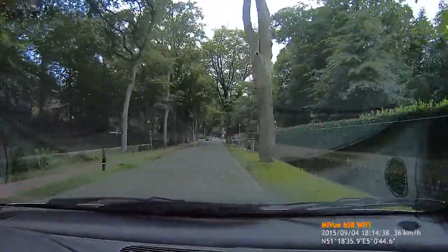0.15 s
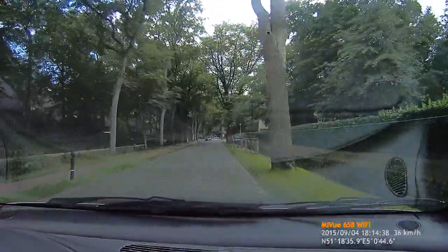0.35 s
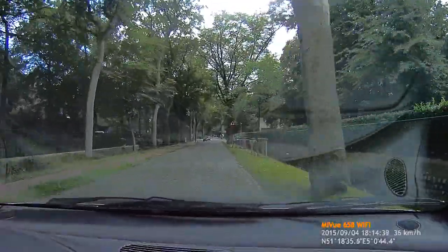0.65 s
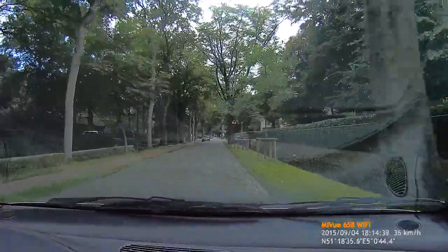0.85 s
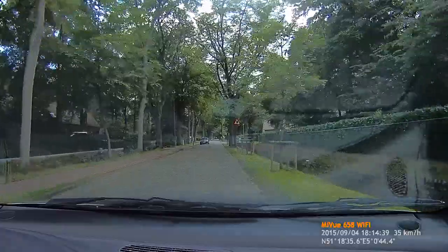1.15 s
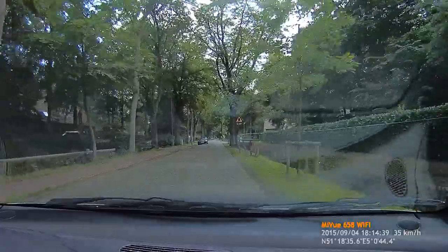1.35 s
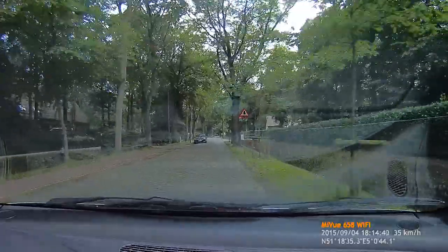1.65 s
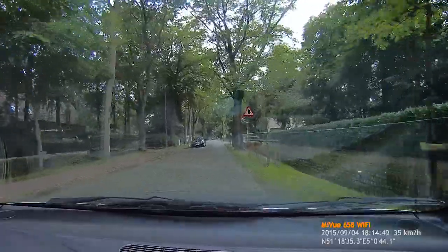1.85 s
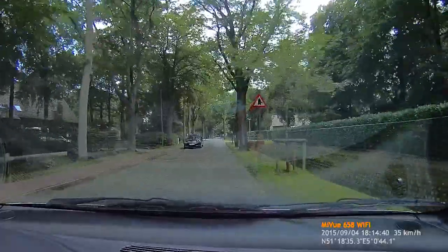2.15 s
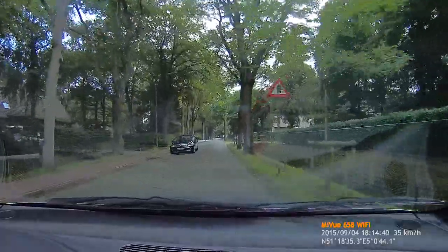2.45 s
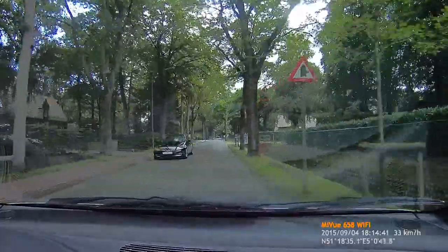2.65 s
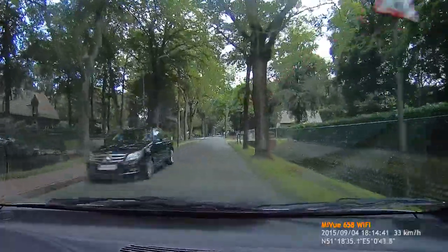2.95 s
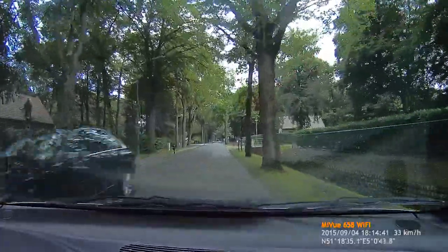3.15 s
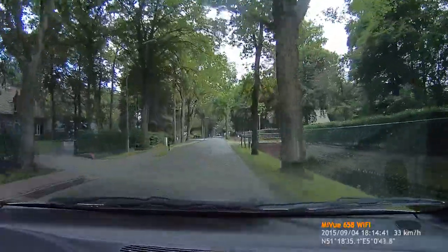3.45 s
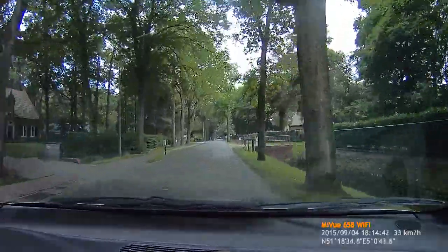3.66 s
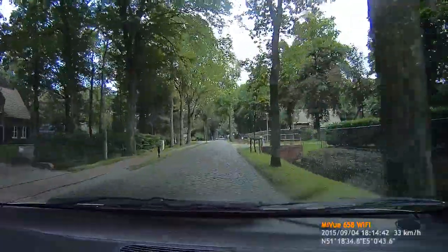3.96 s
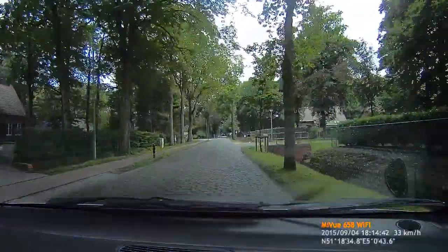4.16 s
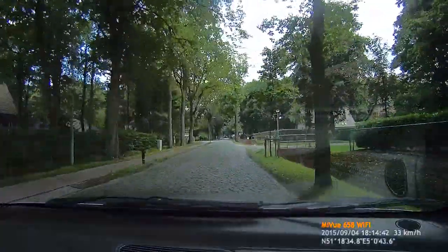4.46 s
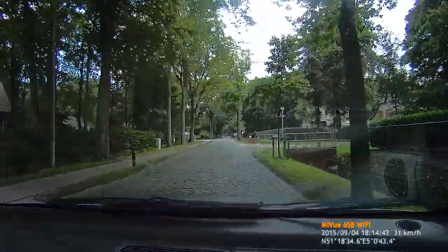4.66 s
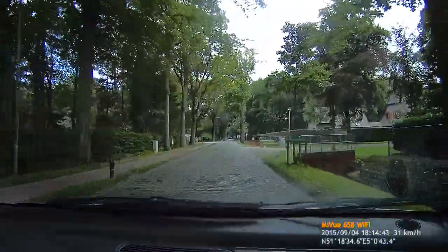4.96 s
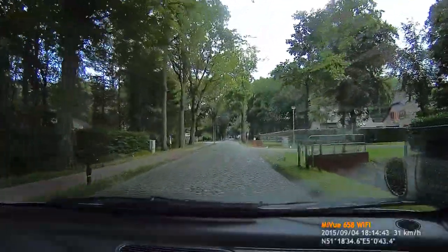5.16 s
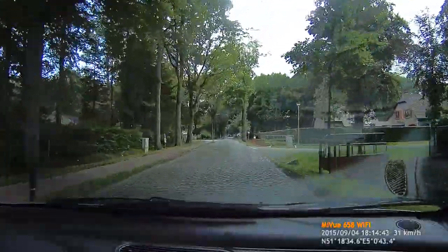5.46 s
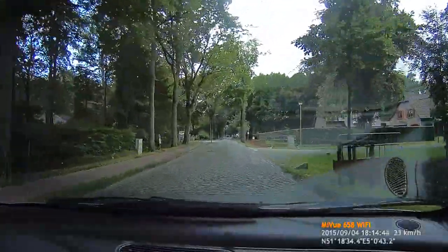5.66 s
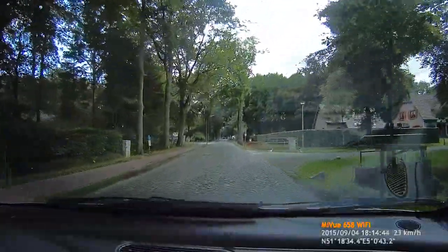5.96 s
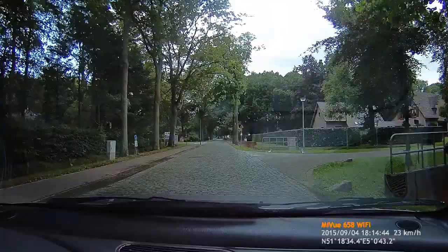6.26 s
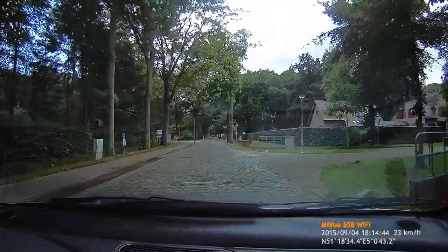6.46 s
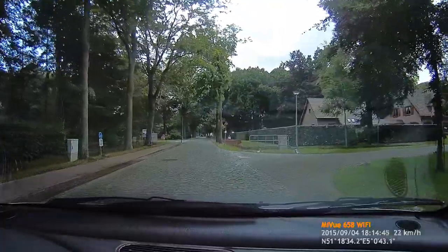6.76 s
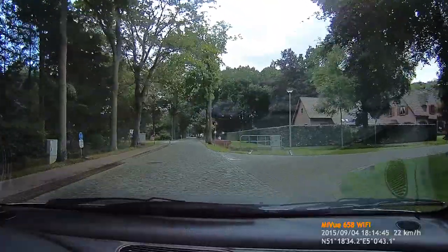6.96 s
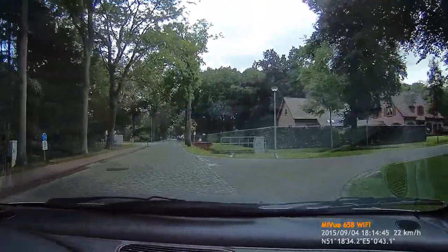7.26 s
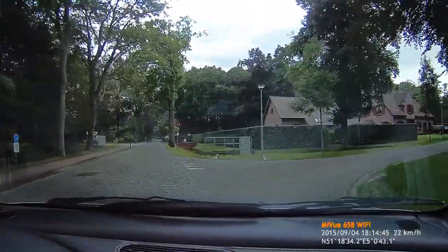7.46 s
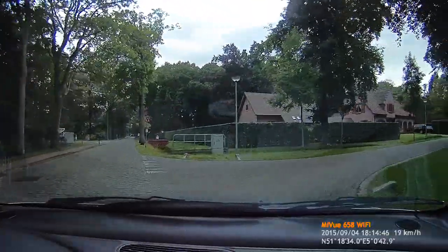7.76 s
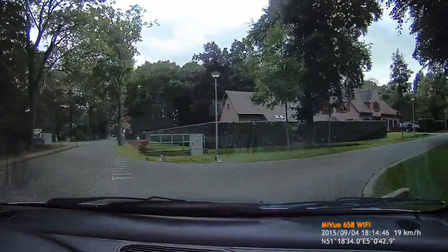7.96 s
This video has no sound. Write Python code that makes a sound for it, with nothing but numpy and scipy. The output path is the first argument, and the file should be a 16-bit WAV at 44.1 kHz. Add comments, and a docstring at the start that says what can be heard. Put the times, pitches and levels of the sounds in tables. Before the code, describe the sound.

Inside a slowing car on cobblestones, tyres drum over a deep boom while loose trim rattles and a turn indicator starts clicking.

```python
"""Inside a car slowing on cobbles, heard at the windscreen. From the start the stones shake the body
into a deep boom and the tyres drum and roar; loose trim buzzes, rattles, ticks and snaps, and bumps
knock the dashboard. At 3.4 s the turn indicator relay starts clicking, closing and opening in turn.
From about 5 s road and trim grow quieter; the relay clicks on to the end, over faint hiss."""
import sys
import numpy as np
from scipy import signal
from scipy.fft import rfft, irfft, next_fast_len
from scipy.io import wavfile
from scipy.ndimage import uniform_filter1d, map_coordinates

SR = 44100
rng = np.random.default_rng(int(sys.argv[2]) if len(sys.argv) > 2 else 0)


def dump(signal):
    """Clip the signal to [-1, 1] and save it as 16-bit WAV at the path in sys.argv[1]."""
    limited = np.clip(np.atleast_2d(signal).T, -1, 1)
    pcm = np.round(limited * 32767).astype(np.int16)
    wavfile.write(sys.argv[1], SR, pcm)


N = 357648

# Microphone hiss. Each row: frequency in Hz, density in dB.
HISS_SPECTRUM = [(880, -33.5), (1500, -13.5), (2040, -9), (3120, -7.5), (3540, -6.5), (6300, -10),
                 (8180, -8.5), (8410, -10), (12300, -10), (13400, -26.5), (15000, -33)]
# Electronics whine. One row: frequency in Hz, level in dB.
WHINE_TONE = [(7881, -88.5)]
# Loose trim. Each row: time in seconds, chatter in dB, fizz in dB.
TRIM_LEVELS = [(0.0, -63.5, -72.5), (0.67, -59.5, -82), (0.97, -62, -76), (1.49, -64.5, -81.5),
               (2.21, -59.5, -74), (2.39, -62.5, -80.5), (2.89, -61.5, -75.5), (3.45, -66, -77.5),
               (3.61, -66, -79.5), (4.09, -63.5, -78), (4.61, -62.5, -75.5), (4.79, -64.5, -78.5),
               (5.17, -69, -82), (5.6, -72.5, -83.5), (5.75, -73.5, -86), (5.94, -66, -78),
               (6.19, -72, -82), (7.16, -73.5, -86), (7.93, -75, -83.5), (8.11, -77, -88)]
# Resonances. Each row: frequency in Hz, width in Hz, gain in dB.
PANEL_MODES = [(1298, 205, 7), (2040, 380, -1.5), (2350, 240, -4.5), (3170, 710, -8.5), (4830, 2600, -14.5)]
METAL_MODES = [(5240, 1700, 0.5), (7560, 1800, 3), (9650, 1300, 3.5), (11950, 1500, 2), (14500, 860, -7.5)]
TICK_MODES = [(3290, 620, -5.5), (4860, 1260, 4), (5253, 830, 4.5), (6800, 940, -17), (2140, 1440, 1)]
DASH_MODES = [(780, 780, 7), (1180, 560, 9), (1530, 140, 0), (2000, 380, -1.5), (3630, 1400, -15.5)]
HOLLOW_MODES = [(1220, 150, 1), (1540, 99, 4.5), (1895, 100, 2.5), (3680, 360, -10.5), (4750, 200, -9.5),
                (5500, 330, -18.5)]  # plastic around the slipping part
TYRE_MODES = [(89.4, 16.8, 2.5), (135.4, 18.3, 0.5), (179.3, 31.4, -10), (240.7, 37.2, -9),
              (296.3, 92, -17.5)]
BOOM_MODES = [(36.1, 6.44, 4.5), (57.9, 13.9, -3), (26.6, 12.5, -6.5), (68, 31, -10.5)]
# Loose bits. Each row: pitch in Hz, gain in dB, t60 in seconds.
LOOSE_BITS = [(1360, 4.5, 0.019), (1820, 3.5, 0.017), (2140, 5.5, .012), (2460, -1.5, 0.0098),
              (3550, -0.5, 0.0093), (4520, -9, 0.0084), (5600, -7.5, 0.0077), (7500, -16.5, .004),
              (11500, -12.5, .003)]
# Small parts in motion. Each row: start in seconds, relative level in dB.
TICK_HITS = [(0.06, -50), (0.193, -54.5), (0.252, -61), (0.2809, -66), (0.39, -63), (0.4131, -60),
             (0.456, -52.5), (0.506, -64), (0.597, -71), (0.895, -66), (0.973, -64), (1.0244, -58),
             (1.0375, -59), (1.146, -57), (1.3212, -59), (1.3498, -57), (1.3631, -58), (1.3897, -56),
             (1.449, -62.5), (1.4615, -62), (1.6265, -52), (1.6914, -59), (1.706, -67), (1.7209, -59),
             (1.731, -60), (1.7405, -57), (1.8486, -54.5), (1.858, -55.5), (1.8964, -52.5), (2.333, -55),
             (2.347, -64), (2.405, -61), (2.4226, -59), (2.665, -65), (2.976, -67), (3.242, -63),
             (2.4874, -59), (2.5098, -60), (2.6895, -57), (2.717, -56.5), (2.7482, -61), (2.787, -59),
             (2.839, -58), (2.987, -56.5), (3.0705, -58), (3.125, -55.9), (3.198, -53.5), (3.3622, -58),
             (3.3863, -49), (3.4455, -69), (3.4686, -61), (3.6526, -64), (3.6797, -70), (3.5997, -62),
             (3.968, -65), (4.0439, -60), (4.1145, -54.5), (4.1241, -58), (4.3357, -56), (4.4717, -60),
             (4.49, -63), (4.681, -59), (4.743, -61), (4.759, -57), (4.858, -70), (4.8995, -64),
             (4.928, -66), (4.9538, -54), (5.082, -66), (5.1278, -60), (5.355, -68), (5.42, -69),
             (5.4415, -51), (5.4703, -65), (5.5448, -63), (5.673, -60), (6.0901, -65), (6.6347, -57),
             (6.9422, -58), (7.016, -64), (7.171, -64.5), (7.446, -54), (7.844, -61), (7.935, -54.5),
             (8.022, -59)]
PING_HITS = [(0.561, -64), (0.6454, -59), (0.874, -63), (1.2805, -58), (2.1588, -56), (2.7262, -59),
             (3.0518, -63), (3.0668, -56), (3.3622, -59), (4.3908, -58)]
TAP_HITS = [(0.4783, -45), (0.5237, -50), (1.093, -49), (1.5773, -50), (1.6717, -54), (1.9699, -51),
            (3.0842, -45), (3.1178, -48), (3.766, -54), (3.8, -49), (3.816, -48), (4.147, -53),
            (4.1589, -48), (4.3384, -51), (5.4014, -56), (5.6289, -58), (6.0776, -51), (6.638, -52),
            (6.707, -54), (7.2779, -52.5), (7.889, -56)]
SLIP_HITS = [(0.6538, -61), (0.6777, -56), (0.7036, -59.5), (0.7286, -57.5), (0.752, -60), (0.7755, -60.5),
             (0.798, -62.5), (0.8179, -63), (2.1207, -65.5), (2.142, -65), (2.168, -60), (2.192, -63),
             (2.2174, -61), (2.2394, -61), (2.2628, -60), (2.287, -63.5)]  # one slip per swing of the body
# Tapping part bouncing. Each row: start in seconds, length in seconds, relative level in dB.
BOUNCE_RUNS = [(3.431, .07, -52), (3.512, .05, -49.5), (3.661, .06, -50), (5.7174, .05, -50.5),
               (5.835, .06, -55)]
# Its upper modes. Each row: frequency in Hz, gain in dB.
TAP_UPPER_MODES = [(2520, -8.5), (3550, -11)]
# Dashboard knocks. Each row: start in seconds, relative level in dB, pitch in Hz.
DASH_HITS = [(0.465, -37.5, 950), (0.473, -35, 947), (0.605, -44, 675), (0.676, -42, 930),
             (0.797, -40.5, 895), (1.078, -44, 750), (1.419, -47, 603), (1.875, -38, 604),
             (2.046, -40, 738), (2.075, -39, 650), (2.121, -35, 670), (2.145, -42, 1000),
             (2.169, -33.5, 666), (2.23, -34.5, 714), (2.371, -35, 686), (2.804, -41, 1150),
             (3.161, -33, 598), (3.238, -42, 600), (3.352, -46, 950), (3.765, -35, 665),
             (3.978, -58.5, 2260), (4.128, -50, 1200), (4.473, -41, 900), (5.138, -41.5, 603),
             (5.352, -39, 596), (5.402, -40, 565), (5.629, -41, 580), (5.717, -43, 694), (6.107, -41, 665),
             (6.177, -44, 1070), (6.181, -45, 1570), (6.267, -57, 1070), (6.7874, -58, 1500),
             (6.8567, -55.5, 2250), (7.2459, -54, 1380), (7.277, -41, 910), (7.307, -49, 1150),
             (7.42, -50, 990), (7.632, -60, 1310)]
# A part slides and catches. Each row: start in seconds, relative level in dB, crack, knock and
# ring gains in dB, slide and t60 in seconds.
SNAP_HITS = [(0.2572, -43.5, 0, -2, 4, 0.00033, 0.0059), (1.28, -63, -12.5, 1.5, 9, 0.0024, 0.03),
             (2.753, -55.5, -17, -6, -4, 0.0037, 0.04), (2.801, -43, -22, -3.5, -3.5, 0.018, 0.067),
             (4.627, -54, -19, 3, -1.5, 0.0023, 0.045), (5.1832, -47.5, -14, -13, -12, 0.0089, 0.021),
             (5.2492, -70, -10, 7.5, 10, 0.0092, .08), (5.3305, -66.5, -15, 4, 12, 0.0063, 0.035),
             (5.5318, -74, -10, 7, 12, .01, .06), (5.828, -69.5, -11, 9, 1, 0.004, 0.26),
             (5.9288, -66, -20, 6.5, 1, 0.0026, 0.03), (6.1772, -47, -38, -8, 2, 0.0098, 0.054)]
# Relay case ring. Each row: frequency in Hz, gain in dB, t60 in seconds.
CLOSING_MODES = [(2053, 7.5, 0.027), (2240, -10, 0.026), (1570, -3, 0.027), (3630, -4, 0.034)]
OPENING_MODES = [(1792, 2.5, 0.033), (2060, -4, 0.03), (2360, -3, 0.028), (3680, -10.5, 0.032)]
# Road noise as the car slows. Each row: time in seconds, boom, drum and roar in dB.
ROAD_LEVELS = [(0, -22, -25, -37.5), (.2, -24.5, -30, -49), (.7, -21, -30, -45), (1.2, -25.5, -30.5, -49),
               (1.6, -23, -32.5, -49), (2.02, -25, -30.5, -48.5), (2.4, -22.5, -32.5, -47.5),
               (3.1, -23, -29.5, -47), (3.6, -24.5, -31, -49), (4.3, -20, -31, -51),
               (4.7, -25.5, -33, -49.5), (5.15, -25, -35, -52.5), (5.8, -27.5, -35, -53.5),
               (6.15, -29.5, -37, -54.5), (6.9, -30, -37, -58.5), (7.3, -27, -37.5, -56.5),
               (8.11, -29.5, -39.5, -55)]
# Tread roar. Each row: frequency in Hz, density in dB.
TREAD_SPECTRUM = [(180, -32), (300, 0), (408, -3.5), (446, -11.5), (498, -7.5), (747, -10), (818, -13),
                  (1070, -20), (1650, -32), (1840, -29.5), (2600, -41.5), (3380, -51.5), (5720, -120)]
# Raised stones. Each row: time in seconds, drum swell in dB, roar swell in dB.
RAISED_STONES = [(.07, 2, -3), (0.296, 4.5, 9), (.58, 4.5, -1.5), (1.45, 2, -1.5), (1.65, 6, 1.5),
                 (1.89, -0.5, 6), (2.13, 1, 4.5), (2.38, 4, 4.5), (2.648, 4, 4.5), (2.7, 4, 1),
                 (3.16, -0.5, 2), (3.43, 0, 3), (4.399, -5, 7), (4.501, -2.5, -7), (5.36, 2, 4),
                 (5.47, 0.5, 4), (5.55, 0.5, 4.5), (5.721, -1, 7.5), (5.79, 1.5, 3), (6.202, 3, -6.5),
                 (6.662, -3, 12.5), (7.01, 3, 9), (7.07, 5, 4), (7.37, 5, 2), (7.43, 2.5, -4.5),
                 (7.82, 0.5, -2.5)]
# The low boom swells and dips irregularly. Each row: time in seconds, change in dB, length in seconds.
BOOM_SWELLS = [(0.082, 6.5, 0.054), (0.188, -10.5, .04), (0.288, 6.5, 0.078), (0.505, 7.5, 0.017),
               (0.63, -4.5, 0.051), (1, 5.5, 0.036), (1.137, 2.5, 0.054), (1.195, -7, 0.023),
               (1.297, -8, 0.035), (1.378, 5, 0.17), (1.85, 5, 0.11), (1.99, -9, 0.04), (2.203, -5, 0.018),
               (2.247, 6.5, 0.056), (2.413, 0.5, 0.044), (2.608, 6, 0.04), (2.83, 1, 0.096),
               (3.393, 11.5, 0.024), (3.525, 7.5, 0.027), (3.6, -4.5, 0.043), (3.7, 4.5, 0.051),
               (3.743, -8.5, 0.017), (3.829, 5.5, 0.05), (4.003, 1, 0.13), (4.168, 6, 0.011),
               (4.096, -6, .03), (4.232, -7, 0.038), (4.578, 3, 0.072), (4.682, -7, .04),
               (4.76, 4.5, 0.032), (4.806, -9, .02), (4.886, -6.5, 0.024), (4.938, 6, 0.033),
               (5.29, -6, 0.018), (5.394, 7, 0.06), (5.42, -10.5, 0.028), (5.467, 8.5, 0.023),
               (5.525, -1, .025), (5.882, 3, 0.073), (6.204, -12, .025), (6.26, 5.5, 0.072),
               (6.63, 1.5, 0.071), (6.91, 4.5, 0.013), (7.456, 5.5, 0.074), (7.6, -7, 0.024),
               (7.653, 8, 0.013)]

STONE_S = 0.041  # wheel over one stone
RELAY_START_S, RELAY_STEP_S = 3.4057, 0.32591
BOUNCE_STEP_S, BOUNCE_FADE_DB_PER_S = 0.0168, 26
NOTCH_HZ, NOTCH_WIDTH_HZ, NOTCH_DB = 2940, 580, -16.5
TOP_HZ = 15000


def amp(db):
    """dB to gain."""
    return 10 ** (np.asarray(db) / 20)


def unit(x):
    """x at rms 1."""
    return x / np.sqrt(np.mean(x ** 2) + 1e-20)


def curves(rows):
    """A per-sample curve for each column after the time."""
    times_s, *columns = np.transpose(rows)
    return [np.interp(np.arange(N) / SR, times_s, column) for column in columns]


def wobble(rate_hz):
    """Smooth random curve."""
    knots = rng.standard_normal(int(N * 200 / SR) + 4)
    return map_coordinates(knots, [np.arange(N) * rate_hz / SR])


def swells(times_s, heights_db, lengths_s):
    """Sum of bell curves, in dB."""
    t, sum_db = np.arange(0, N, 64) / SR, 0
    for at_s, db, length_s in np.broadcast(times_s, heights_db, lengths_s):
        sum_db += db * np.exp(-2 * ((t - at_s) / length_s) ** 2)
    return np.interp(np.arange(N) / SR, t, sum_db)


def filtered(x, *responses):
    """x through frequency responses in series."""
    size = next_fast_len(N + SR // 2)
    for response in responses:
        x = irfft(rfft(x, size) * response(np.fft.rfftfreq(size, 1 / SR)), size)[:N]
    return x


def modes(table):
    """Response of resonances of alternating sign."""
    return lambda f: sum((-1) ** k * amp(db) * 1j * f * width / (hz * hz - f * f + 1j * f * width)
                         for k, (hz, width, db) in enumerate(table))


def colour(points):
    """Response through (Hz, dB) points, log axis."""
    hz, db = np.transpose(points)
    return lambda f: amp(np.interp(np.log(f + 1), np.log(hz + 1), db))


def band(lo_hz, hi_hz):
    """Band-pass: third order below, second above."""
    return lambda f: (1j * f / lo_hz / (1 + 1j * f / lo_hz)) ** 3 / (1 + 1j * f / hi_hz) ** 2


def impulses(per_s, spread_db):
    """Random impulses of either sign, a few much larger."""
    chance, sign, size = rng.random((3, N))
    return (chance < per_s / SR) * np.sign(sign - 0.5) * amp(-spread_db * np.log(size + 1e-4))


def faint_hits(per_s):
    """Random (s, dB) hits that follow the chatter level."""
    gap, scatter = rng.random((400, 2)).T
    times_s = np.cumsum(-np.log(gap + 1e-9)) / per_s
    chatter_db = curves(TRIM_LEVELS)[0][np.minimum(times_s * SR, N - 1).astype(int)]
    hits = np.c_[times_s, chatter_db - 4 + 8 * (scatter - 0.5)]
    return hits[times_s < (N - 1) / SR].tolist()


def rings(hits, pitch_hz, rise_s, t60_s, rough, gain_db):
    """A short, rough, slightly detuned ring per hit."""
    out, t = np.zeros(N + SR), np.arange(SR // 16) / SR
    for (start_s, db), hz in zip(hits, np.resize(pitch_hz, len(hits))):
        noise = rng.standard_normal(len(t))
        drift = np.cumsum(uniform_filter1d(rough * noise, size=30))
        phase = 2 * np.pi * hz * (1 + 0.028 * noise[0]) * t + drift
        envelope = amp(db + gain_db - 60 * t / t60_s) * (1 - np.exp(-t / rise_s))
        out[round(start_s * SR):][:len(t)] += envelope * np.sin(phase)
    return out[:N]


def cabin_echo(x, t60_s=0.09):
    """Glass and seats add a short, dull tail, drawn anew every 1/8 s."""
    size = SR // 8
    t = np.arange(size) / SR
    blocks = np.pad(x, (0, -N % size)).reshape(-1, size)
    tails = amp(-60 * t / t60_s) * (t > 0.0015) * rng.standard_normal(blocks.shape)
    tails /= np.linalg.norm(tails, axis=1, keepdims=True)
    wet = signal.fftconvolve(blocks, tails, axes=1)
    overlap = np.pad(wet[:-1, size:], ((0, 0), (0, 1))).ravel()
    echo = wet[:, :size].ravel() + np.pad(overlap, (size, 0))
    return x + amp(-6.5) * filtered(echo[:N], band(180, 9000))


def electronics():
    """Microphone hiss and a thin whine."""
    hiss = amp(-78.5 + 2.3 * wobble(15)) * unit(filtered(rng.standard_normal(N), colour(HISS_SPECTRUM)))
    (hz, db), = WHINE_TONE
    whine = np.sqrt(2) * amp(db + 1.2 * wobble(7.6)) * np.sin(2 * np.pi * hz * np.arange(N) / SR)
    return hiss + whine


def trim_buzz():
    """Shaken panels chatter in clumps of tiny contacts; smaller parts fizz above."""
    chatter_db, fizz_db = curves(TRIM_LEVELS)
    times_s, _, roar_swell_db = np.transpose(RAISED_STONES)
    shake_db = 0.62 * swells(times_s, roar_swell_db, STONE_S) + wobble(4.9)
    panel_hits = amp(shake_db + 2.8 * wobble(55)) * impulses(per_s=1600, spread_db=1.9)
    metal_hits = amp(shake_db + 5.1 * wobble(60)) * impulses(per_s=1600, spread_db=2.1)
    chatter = filtered(panel_hits, modes(PANEL_MODES), band(630, 6000))
    fizz = filtered(metal_hits, modes(METAL_MODES), band(2100, 14000))
    return amp(chatter_db - 3.5) * unit(chatter) + amp(fizz_db) * unit(fizz)


def loose_bits(per_s=600, spread_db=2.6, detune=0.089):
    """Bits of trim jiggle throughout: short rings at scattered pitches."""
    gap, pick, size, tune = rng.random((5400, 4)).T
    starts = (SR * np.cumsum(-np.log(gap + 1e-9)) / per_s).astype(int)
    hz, gain_db, t60_s = np.array(LOOSE_BITS)[(pick * len(LOOSE_BITS)).astype(int)].T[..., None]
    clump_db = curves(TRIM_LEVELS)[0] + 2.8 * wobble(18)
    hit_db = clump_db[np.minimum(starts, N - 1)] - spread_db * np.log(size + 1e-3)
    offsets = np.arange(SR // 80)
    t = offsets / SR
    pitch_hz = hz * (1 + detune * (2 * tune[:, None] - 1))
    envelope = amp(hit_db[:, None] + gain_db - 5 - 60 * t / t60_s) * (1 - np.exp(-t / 0.0007))
    ring = envelope * np.sin(2 * np.pi * pitch_hz * t)
    return np.bincount((starts[:, None] + offsets).ravel(), ring.ravel(), N)[:N]


def plastic_ticks():
    """Hard plastic rings for a few cycles; its mount absorbs one band."""
    blows = np.zeros(N)
    for start_s, db in TICK_HITS + faint_hits(per_s=20):
        blows[round(start_s * SR)] = amp(db + 26.5)
    mount = lambda f: 1 - (1 - amp(NOTCH_DB)) * modes([(NOTCH_HZ, NOTCH_WIDTH_HZ, 0)])(f)
    return filtered(blows, modes(TICK_MODES), modes(TICK_MODES), mount)


def pings():
    """Bumps ping a small hard part."""
    return rings(PING_HITS, pitch_hz=5570, rise_s=0.00067, t60_s=0.015, rough=0.32, gain_db=5.5)


def tapping_part():
    """A loose part taps and bounces in its seat, ringing in three modes."""
    bounces = [(start_s + s, db - BOUNCE_FADE_DB_PER_S * s + rng.normal(0, 0.77))
               for start_s, length_s, db in BOUNCE_RUNS for s in np.arange(0, length_s, BOUNCE_STEP_S)]
    hits = TAP_HITS + bounces + faint_hits(per_s=5.8)
    upper = sum(rings(hits, hz, rise_s=0.00056, t60_s=0.016, rough=0.28, gain_db=db)
                for hz, db in TAP_UPPER_MODES)
    return upper + rings(hits, pitch_hz=1850, rise_s=0.0012, t60_s=0.02, rough=0.15, gain_db=2)


def dash_thuds():
    """Bumps knock the dashboard."""
    hits = np.array(DASH_HITS)
    return rings(hits[:, :2], pitch_hz=hits[:, 2], rise_s=0.0012, t60_s=0.024, rough=0.099, gain_db=2.5)


def trim_snaps(grit_db=5.5):
    """A part slides in a spray of catches: bright burst, plastic crack, dash knock, hollow ring."""
    drives, t = np.zeros((4, N + SR)), np.arange(SR // 10) / SR
    slips = [(start_s, db, -11, 3, 7, 0.005, 0.018) for start_s, db in SLIP_HITS]  # as SNAP_HITS rows
    for start_s, db, crack_db, knock_db, ring_db, slide_s, t60_s in SNAP_HITS + slips:
        fall_db = 500 * np.minimum(t, slide_s) + 60 * np.maximum(t - slide_s, 0) / t60_s
        envelope = amp(db - fall_db) * (1 - np.exp(-t / 0.00082))
        grit = unit(rng.standard_normal((4, len(t))) * amp(grit_db * rng.standard_normal(len(t))))
        gains = amp([[4], [crack_db + 17], [knock_db + 13], [ring_db + 8.5]])
        drives[:, round(start_s * SR):][:, :len(t)] += gains * envelope * grit
    bright, crack, knock, ring = drives[:, :N]
    return (filtered(bright, modes(METAL_MODES), band(5800, 31000))
            + filtered(crack, modes(TICK_MODES), modes(TICK_MODES))
            + filtered(knock, modes(DASH_MODES))
            + filtered(ring, modes(HOLLOW_MODES)))


def indicator_relay():
    """Closes and opens in turn: a contact click, then the case ring swells and dies."""
    click, case = np.zeros((2, N + SR))
    t = np.arange(SR // 16) / SR
    click_envelope = amp(-60 * t / 0.03) * (1 - np.exp(-t / 0.00097))
    case_rise = (1 - np.exp(-t / 0.0035)) ** 2
    closing, opening = (-40, -51, CLOSING_MODES), (-44, -44.2, OPENING_MODES)
    for k, start_s in enumerate(np.arange(RELAY_START_S, N / SR, RELAY_STEP_S)):
        click_db, case_db, case_modes = opening if k % 2 else closing
        start = round(start_s * SR)
        for hz, db, t60_s in case_modes:
            envelope = case_rise * amp(case_db + db + rng.normal(0, 2) - 60 * t / t60_s)
            # armature bounce drifts the phase
            drift = np.cumsum(uniform_filter1d(0.11 * rng.standard_normal(len(t)), size=20))
            case[start:][:len(t)] += envelope * np.sin(2 * np.pi * hz * t + drift)
        click[start:][:len(t)] += amp(click_db) * click_envelope * rng.standard_normal(len(t))
    return filtered(click[:N], modes(METAL_MODES), band(10000, 18000)) + case[:N]


def tyres():
    """Carcasses drum on the stones; the tread roars through the floor."""
    _, drum_db, roar_db = curves(ROAD_LEVELS)
    times_s, drum_swell_db, roar_swell_db = np.transpose(RAISED_STONES)
    drum_db += swells(times_s, drum_swell_db, STONE_S)
    roar_db += swells(times_s, roar_swell_db, STONE_S)
    carcass_hits = amp(1.3 * wobble(9)) * impulses(per_s=600, spread_db=2.4)
    tread_hits = amp(1.44 * wobble(30)) * impulses(per_s=3000, spread_db=0.95)
    drum = filtered(carcass_hits, modes(TYRE_MODES), band(44.2, 540))
    roar = filtered(tread_hits, colour(TREAD_SPECTRUM))
    return amp(drum_db) * unit(drum) + amp(roar_db) * unit(roar)


def body_boom():
    """Stone edges ring the cabin; the low boom swells and dips irregularly."""
    ring = filtered(impulses(per_s=400, spread_db=0.29), modes(BOOM_MODES), band(13.5, 93.4))
    envelope = np.sqrt(np.abs(uniform_filter1d(ring ** 2, size=SR // 24))) / np.std(ring)
    swell_db = swells(*np.transpose(BOOM_SWELLS))
    boom_db = curves(ROAD_LEVELS)[0] + swell_db - swell_db.mean()
    return amp(boom_db) * unit(ring / (envelope + 0.2))


def scene():
    """Mono mix; cabin echo on the struck parts only."""
    steady = body_boom() + tyres() + trim_buzz() + electronics()
    struck = trim_snaps() + indicator_relay() + plastic_ticks()
    struck += tapping_part() + dash_thuds() + pings() + loose_bits()
    return (steady + cabin_echo(struck))[None]


def record(dry):
    """Brick-wall low-pass at TOP_HZ."""
    return filtered(dry[0], lambda hz: hz < TOP_HZ)[None]


dry = scene()
out = record(dry)
dump(out)
```